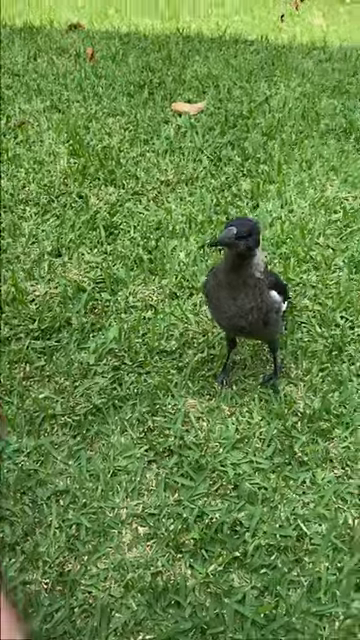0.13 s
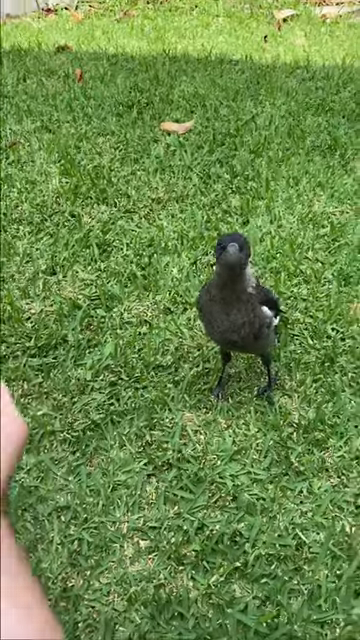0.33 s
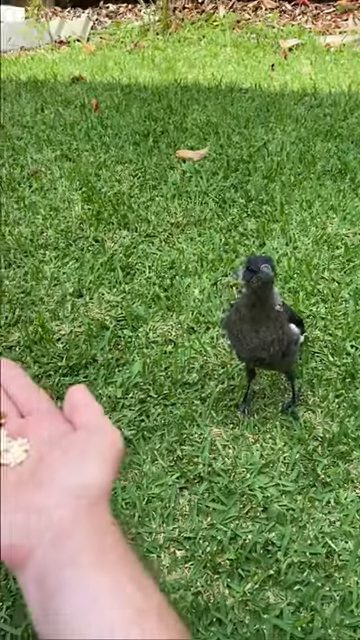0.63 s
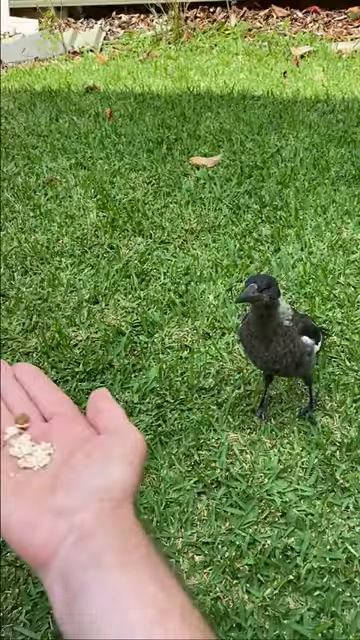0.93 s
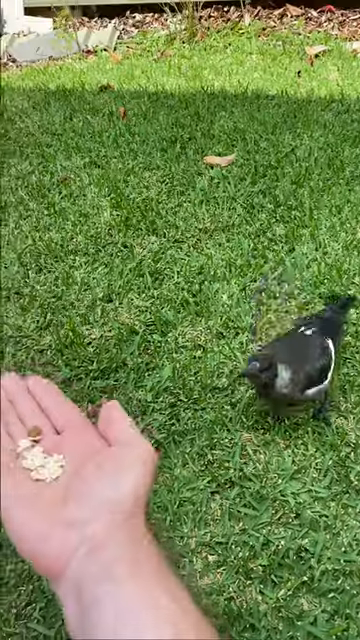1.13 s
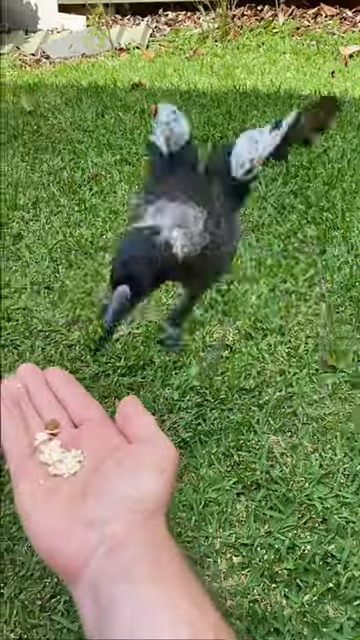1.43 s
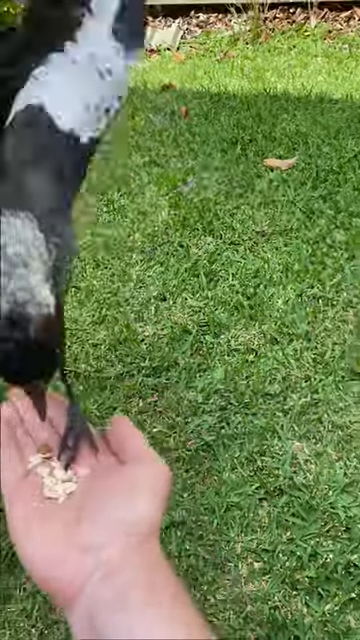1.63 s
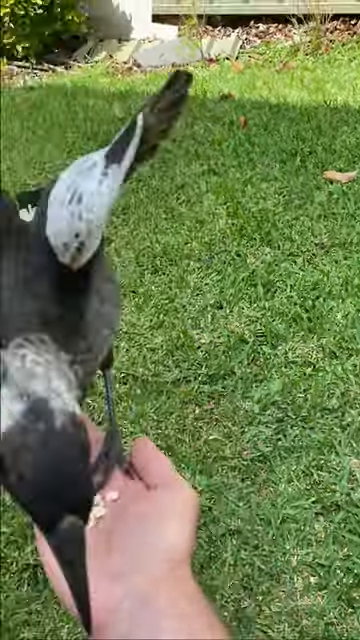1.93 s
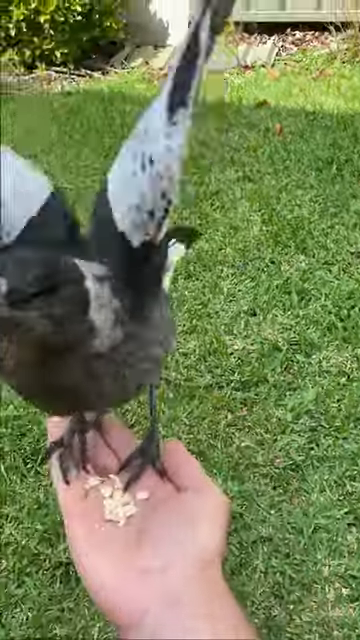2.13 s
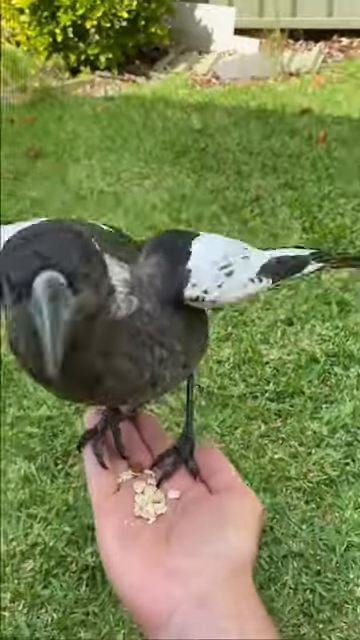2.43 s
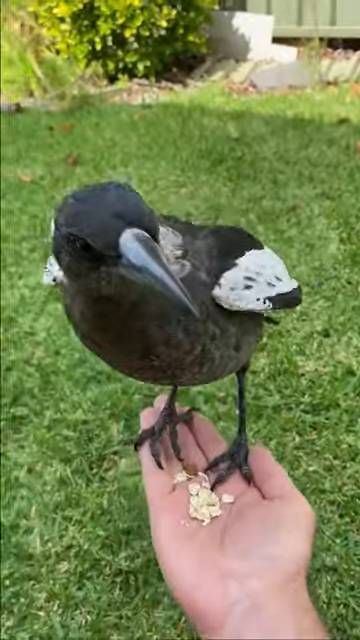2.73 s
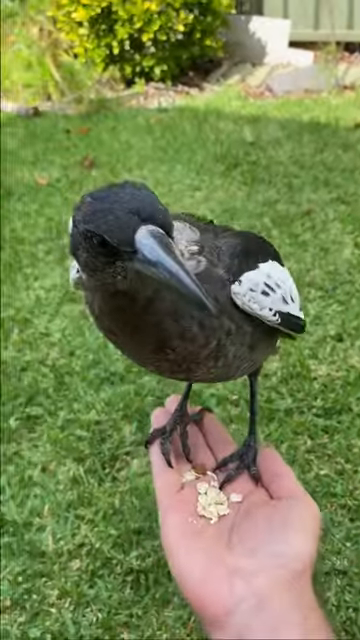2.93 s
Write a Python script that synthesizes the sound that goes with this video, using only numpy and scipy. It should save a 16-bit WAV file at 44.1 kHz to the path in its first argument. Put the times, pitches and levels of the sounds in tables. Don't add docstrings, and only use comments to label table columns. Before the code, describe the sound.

A bird flaps up near the recorder in quick airy strokes with dry quill ticks and muffled air thumps, on an open lawn with rustling leaves, low traffic, echoing far chirps and a faint distant motor hum.

```python
import sys
import numpy as np
from scipy import signal
from scipy.fft import rfft, irfft, next_fast_len
from scipy.io import wavfile
from scipy.ndimage import uniform_filter1d

SR = 44100
rng = np.random.default_rng(int(sys.argv[2]) if len(sys.argv) > 2 else 0)


def elevation(decibels):
    levels = np.asarray(decibels, float)
    return 10 ** (levels / 20)


def output_pcm(signal):
    pcm = np.clip(np.atleast_2d(signal).T, -1, 1) * 32767
    wavfile.write(sys.argv[1], SR, np.round(pcm).astype(np.int16))


N = 135387


def in_time(rows, outside=None):
    s, *columns = np.transpose(rows)
    t = np.arange(N) / SR
    return [np.interp(t, s, column, outside, outside) for column in columns]


def at_hz(points, hz):
    f, values = np.transpose(points)
    return np.interp(np.log(hz), np.log(np.maximum(f, 1)), values)


def drift(rate_hz):
    r = np.exp(-80 * np.pi * rate_hz / SR)
    noise = rng.standard_normal(N // 40 + 2002)
    slow = signal.lfilter([1], [1, -2 * r, r * r], noise)[2000:]
    return np.interp(np.arange(N) / 40, np.arange(len(slow)), slow / slow.std())


def swell(peak_s, rise_s, fall_s):
    t = np.arange(N) / SR - peak_s
    return np.where(t < 0, np.exp(-(t / rise_s) ** 2), np.exp(-np.maximum(t, 0) / fall_s))


def bands(density, patchy_db, spread):
    # f/Hz, likeness 0-1
    likeness = [(40, 0.96), (120, 1), (250, 0.86), (500, 0.66), (1000, 0.48), (2600, 0.68), (4500, 0.94),
                (7000, 0.96)]
    # f/Hz, left over right/dB
    balance = [(60, 0.5), (180, 3), (550, 4.5), (1650, -1.5), (4970, 1), (15000, 0.5)]
    out = 0
    together = drift(2.0)
    corners = 22 * 2 ** (np.arange(30) / 3)
    white = rng.standard_normal((2, 3, N))
    for k, (low, high) in enumerate(zip(corners, corners[1:])):
        sos = signal.butter(2, [low, min(high, .45 * SR)], "band", fs=SR, output="sos")
        shared, *own = signal.sosfilt(sos, white[k % 2])
        hz = np.sqrt(low * high)
        apart = np.clip(spread * (1 - at_hz(likeness, hz)), 0, 1)
        lean = elevation(at_hz(balance, hz) / 2 * np.array([[1], [-1]]))
        patches = elevation(patchy_db * (0.63 * together + drift(25.0)))
        gain = density(hz) * patches * np.sqrt(SR / 2)
        out = out + gain * lean * (np.sqrt(1 - apart) * shared + np.sqrt(apart) * np.array(own))
    return out


def ring(start_s, db, hz, t60_s, exciter):
    x = np.zeros(N) + 1e-18
    start = int(start_s * SR)
    x[start:start + len(exciter)] += elevation(db) * exciter
    r = elevation(-60 / (t60_s * SR))
    w = 2 * np.pi * hz / SR
    return signal.lfilter([0, np.sin(w)], [1, -2 * r * np.cos(w), r * r], x)


def garden():
    # f/Hz, level/dB per Hz
    traffic = [(28, -95.5), (55, -74), (95, -70.5), (150, -80.5), (250, -85.5), (480, -86.5), (1000, -97.5),
               (2200, -105)]
    # t/s, level/dB
    passing = [(0, 3.5), (.4, 3.5), (1.0, 2), (1.4, 0.5), (2.1, 1), (2.7, 1.5), (2.9, 1.5), (3.07, 3.5)]
    # f/Hz, level/dB per Hz
    leaves = [(1200, -114), (2500, -107), (3600, -106), (7500, -110), (10500, -111), (13500, -111),
              (15000, -114), (16500, -124)]
    # t/s, level/dB
    breeze = [(0, 0), (.75, -2), (.9, -3.5), (1.2, -1), (2.3, -4), (2.6, -5.5), (2.68, -11), (3.07, -12.5)]
    breeze_db, = in_time(breeze)
    passing_db, = in_time(passing)

    def density(hz):
        roll_off_db = -9.5 * max(np.log2(hz / traffic[-1][0]), 0)
        rumble = elevation(at_hz(traffic, hz) + roll_off_db + passing_db)
        hiss = elevation(at_hz(leaves, hz) + breeze_db * (hz / 12000) ** 2) * (hz > 900)
        return np.hypot(rumble, hiss)

    return bands(density, patchy_db=1.57, spread=1.35)


def yard_echoes(voice):
    t = np.arange(SR) / SR
    t60_s, tail_db = .42, -3.5
    tail = rng.standard_normal((3, SR)) * elevation(-60 * t / t60_s) * np.clip(t / 0.0039, 0, 1)
    tail = signal.lfilter([1], [1, -.35], 0.25 * tail[0] + 1.4 * tail[1:])
    tail *= elevation(tail_db) / np.sqrt((tail ** 2).sum(axis=1, keepdims=True)) / 0.98
    return signal.fftconvolve(voice[None], tail)[:, :N]


def calls():
    # t/s, f/Hz, level/dB
    sung = [
        [(.475, 2080, -93), (.485, 2110, -64), (.515, 2110, -76), (.535, 2100, -90)],
        [(.508, 2680, -78), (.518, 2660, -59), (.532, 2640, -64), (.543, 2630, -48.5), (.552, 2570, -55.5),
         (.562, 2540, -61)],
        [(.536, 2470, -70), (.549, 2460, -50.5), (.561, 2455, -55), (.572, 2466, -53), (.583, 2455, -69),
         (.594, 2468, -45), (.607, 2488, -63), (.628, 2480, -53.5), (.645, 2480, -88)],
        [(.645, 2480, -73), (.656, 2470, -62), (.674, 2440, -64), (.69, 2440, -65.5), (.705, 2430, -75)],
        [(.605, 2560, -77), (.622, 2544, -57.5), (.645, 2427, -61), (.66, 2320, -59.5), (.68, 2354, -65.5),
         (.73, 2420, -68.5)],
        [(2.105, 1900, -80), (2.145, 1950, -71), (2.168, 2130, -59.5), (2.178, 2180, -63), (2.19, 2220, -68),
         (2.205, 2130, -59.5), (2.222, 1980, -63), (2.24, 1950, -73)],
        [(2.212, 2095, -67), (2.244, 2076, -59), (2.257, 2050, -60.5), (2.268, 2035, -51), (2.277, 2030, -64),
         (2.305, 2055, -64.5), (2.355, 2040, -70.5), (2.41, 2035, -76), (2.47, 2040, -81)],
    ]
    # partials 1-6, level/dB
    partials_db = [
        [0, -8, -30, -30, -30, -30],
        [-2, -2, -24, -19, -34, -36],
        [-13, 0, -24, -8, -11, -13],
        [-5, 0, -25, -14, -18, -24],
        [-1, -12, -26, -30, -12, -36],
        [0, -3, -20, -36, -31, -30],
        [-1, -1, -29, -36, -26, -13],
    ]
    waver, effort_tilt = 0.0065, 0.15
    beak_open_s, steady_s, pan_db = 0.005, .03, 1.4
    voice = 0
    t = np.arange(N) / SR
    for rows, partials in zip(sung, partials_db):
        hz, = in_time(np.array(rows)[:, :2])
        db, = in_time(np.array(rows)[:, ::2], -200)
        smooth = uniform_filter1d(elevation(db), int(steady_s * SR))
        steady_db = 20 * np.log10(np.abs(smooth) + 1e-10)
        phase = 2 * np.pi * np.cumsum(hz * (1 + waver * drift(111.4))) / SR
        for k, partial_db in enumerate(partials):
            opened = np.clip((t - rows[0][0]) / (beak_open_s * k + 0.0026), 0, 1) ** 3
            effort_db = db if k < 3 else steady_db
            strain_db = effort_tilt * k * (effort_db - db.max())
            bead_db = (1.8 + 1.2 * min(k, 1)) * drift(90.0)
            loudness = elevation(effort_db + 3 + partial_db + strain_db + bead_db)
            voice = voice + opened * loudness * np.sin((k + 1) * phase)
    return (voice + yard_echoes(voice)) * elevation(pan_db * np.array([[.5], [-.5]]))


def feather_swish():
    # f/Hz, level/dB per Hz
    feathers = [(300, 10), (900, 2.5), (2000, -3), (4000, -1), (6500, -1.5), (9000, 2), (12500, -2),
                (15500, -0.5)]
    # peak t/s, hiss level/dB, rise/s, fall/s, tilt/dB per octave
    strokes = [(.912, -70, 0.0068, 0.0082, 28), (1.175, -70.5, 0.019, 0.018, -1.5),
               (1.254, -61, 0.04, 0.021, 1), (1.303, -55, 0.022, 0.041, 0), (1.385, -65, 0.016, 0.16, -1.5),
               (1.438, -62, 0.0026, 0.02, -3), (1.495, -65.5, 0.03, 0.026, 0.5),
               (1.57, -69.5, 0.034, 0.22, -2), (1.647, -61.5, 0.032, 0.032, -0.5),
               (1.735, -66.5, 0.023, 0.093, -3), (1.787, -56.5, 0.023, 0.071, -1.5),
               (1.85, -61.5, .015, 0.06, 2), (1.899, -78.5, 0.048, 0.017, -5.5),
               (2.07, -68.5, 0.05, 0.23, 0.5), (2.196, -61, 0.018, 0.064, -1), (2.41, -77, .01, 0.051, 0)]
    shapes = np.array([swell(s, rise, fall) ** 2 for s, _, rise, fall, _ in strokes])
    db, tilt = np.array(strokes)[:, 1], np.array(strokes)[:, 4]
    grain = elevation(1.6 * drift(120.0))

    def density(hz):
        stroke_db = db - 37.5 + at_hz(feathers, hz) + tilt * np.log2(hz / 12000)
        return grain * (hz > 200) * np.sqrt(elevation(stroke_db) ** 2 @ shapes)

    return bands(density, patchy_db=0.25, spread=0.58)


def quill_ticks():
    # t/s, level/dB, f/Hz
    ticks = [(.907, -58, 12700), (.914, -59, 14800), (1.067, -62, 10200), (1.142, -62, 11200),
             (1.169, -57, 11000), (1.19, -50, 8500), (1.219, -57, 6000), (1.239, -42, 8550),
             (1.5236, -45, 13790), (1.5237, -41, 8750), (1.848, -50, 10800), (1.865, -44, 7500),
             (2.413, -62, 11700), (2.712, -68, 13000)]
    t60_s = 0.006 * 0.44
    out = 0
    for s, db, hz in ticks:
        snap = rng.standard_normal(60) * np.exp(-np.arange(60) / 8.9)
        out = out + ring(s, db, hz, t60_s, snap)
    return out


def wing_claps():
    # t/s, peak level/dB, f/Hz, t60/s
    flaps = [(1.239, -55, 550, .045), (1.296, -56, 550, .03), (1.307, -50, 960, .024),
             (1.321, -59, 1150, .018), (1.329, -51, 910, .03), (1.323, -61, 1540, .014),
             (1.435, -51, 700, .028), (1.438, -57, 420, .045), (1.434, -54, 1300, .016),
             (1.434, -61, 1800, .012), (1.434, -57, 2300, .01), (1.795, -54, 600, .06),
             (1.81, -51, 202, .09)]
    out = 0
    for s, db, hz, t60_s in flaps:
        puff = rng.standard_normal(300) * np.hanning(300)
        clap = ring(s, 0, hz, t60_s, puff)
        out = out + elevation(db) * clap / np.abs(clap).max()
    return out


def downdraught():
    # peak t/s, level/dB, rise/s, fall/s
    pushes = [
        (1.52, -52.5, 0.042, 0.29),
        (1.765, -43.5, 0.019, 0.039),
        (1.815, -43, 0.077, 0.07),
        (1.94, -50.5, 0.073, 0.022),
    ]
    sos = signal.butter(3, [42, 89], "band", fs=SR, output="sos")
    low = signal.sosfilt(sos, rng.standard_normal(N))
    return low / low.std() * sum(elevation(db) * swell(s, rise, fall) for s, db, rise, fall in pushes)


def motor():
    # t/s, f/Hz, level/dB
    hum = [
        (1.9, 365.7, -88),
        (2.026, 357.1, -73),
        (2.088, 363.3, -52.5),
        (2.102, 361.2, -79),
        (2.338, 367.2, -60),
        (2.642, 364, -58.5),
        (2.886, 367.7, -68),
        (3.07, 362, -53),
    ]
    hz, = in_time(np.array(hum)[:, :2])
    db, = in_time(np.array(hum)[:, ::2], -200)
    tone = np.sin(2 * np.pi * np.cumsum(hz + 6.86 * drift(13.9)) / SR)
    pan_db = 5.5 * np.array([[.5], [-.5]])
    return elevation(db + 3.0 + 2.0 * drift(9.6) + pan_db) * tone


def scene():
    wings = feather_swish() + quill_ticks() + wing_claps()
    return garden() + calls() + wings + downdraught() + motor()


def low_pass(x):
    return signal.sosfilt(signal.butter(12, 16450, fs=SR, output="sos"), x)


def record(dry):
    # f/Hz, left leads by/rad
    port_phase = [(0, 0), (2900, -.55), (4900, -.2), (7400, -3.1), (8500, -3.2), (12000, -6.25),
                  (13600, -6.35), (16000, -8.3)]
    start_s, stop_hz = .0352, 16100
    size = next_fast_len(N + 2048)
    f, radians = np.transpose(port_phase)
    lead = np.interp(np.arange(size // 2 + 1) * SR / size, f, radians)
    rotation = np.exp(.5j * lead * np.array([[1], [-1]]))
    mix = irfft(rfft(dry, size) * rotation, size)[:, :N]
    mix = mix * (np.arange(N) > start_s * SR)
    mix = signal.sosfilt(signal.cheby2(10, 30, stop_hz, fs=SR, output="sos"), mix)
    return low_pass(mix)


dry = scene()
out = record(dry)
output_pcm(out)
```